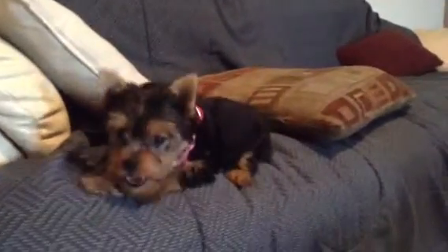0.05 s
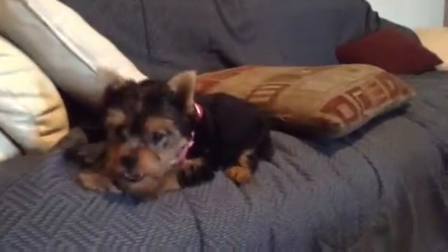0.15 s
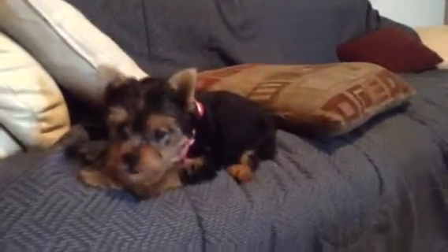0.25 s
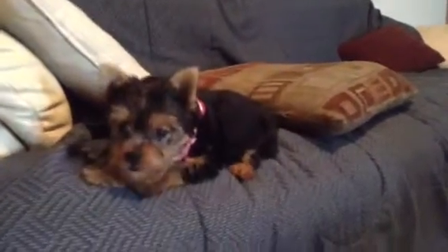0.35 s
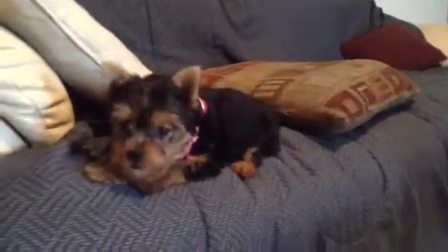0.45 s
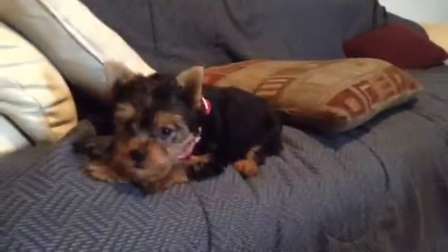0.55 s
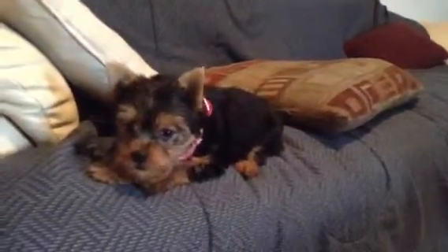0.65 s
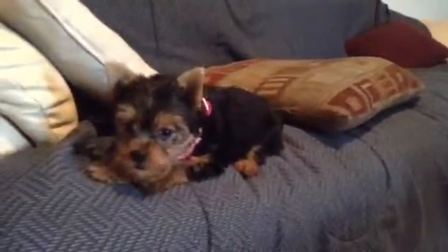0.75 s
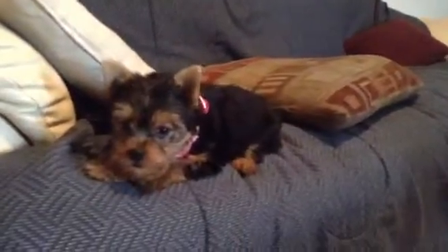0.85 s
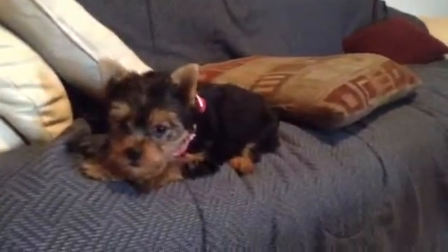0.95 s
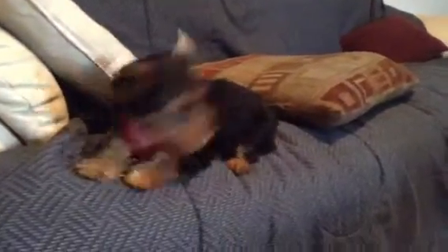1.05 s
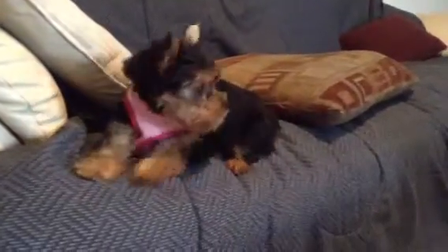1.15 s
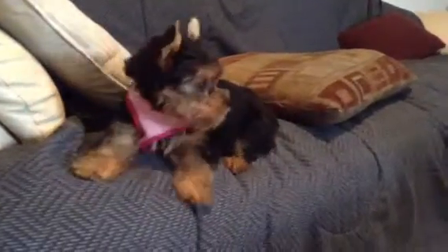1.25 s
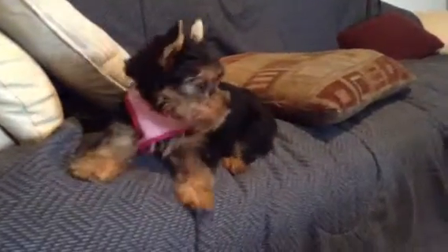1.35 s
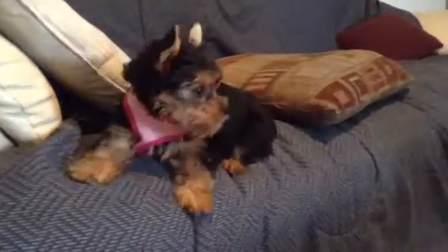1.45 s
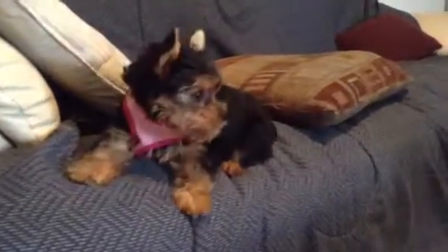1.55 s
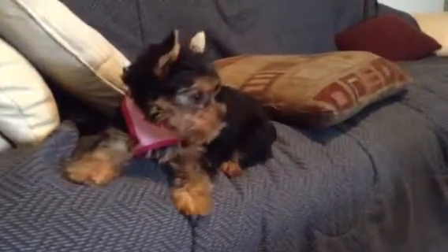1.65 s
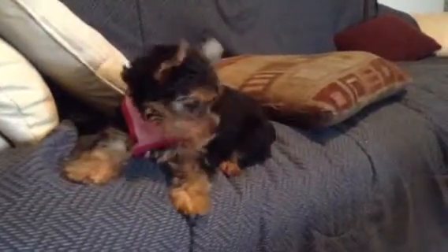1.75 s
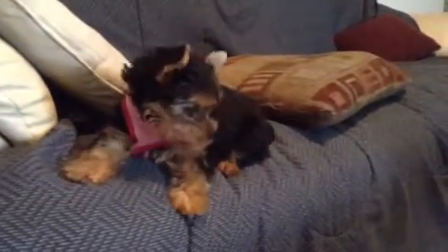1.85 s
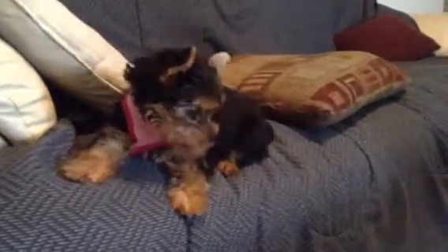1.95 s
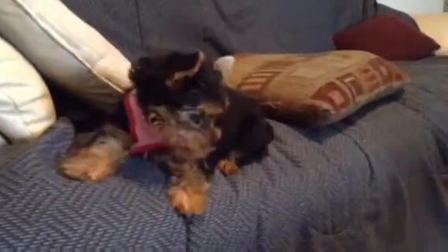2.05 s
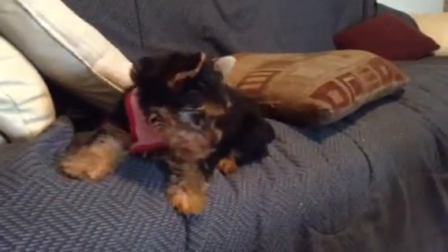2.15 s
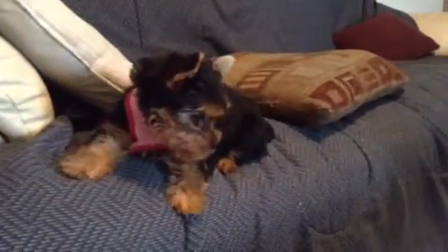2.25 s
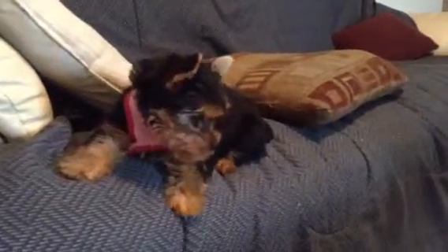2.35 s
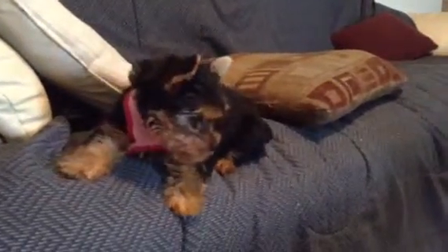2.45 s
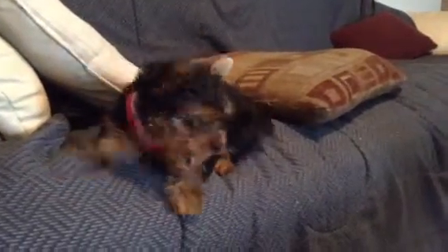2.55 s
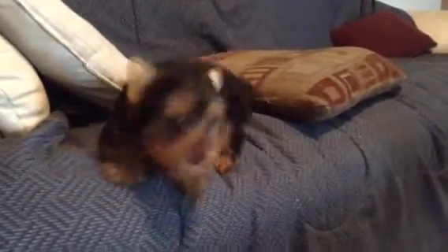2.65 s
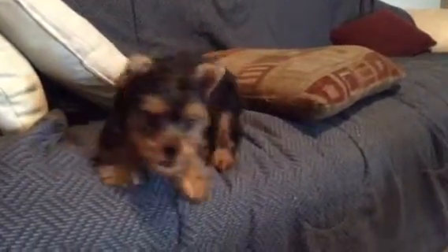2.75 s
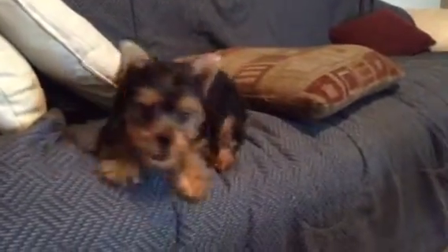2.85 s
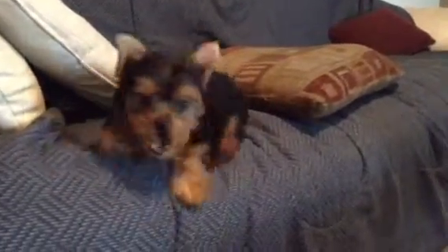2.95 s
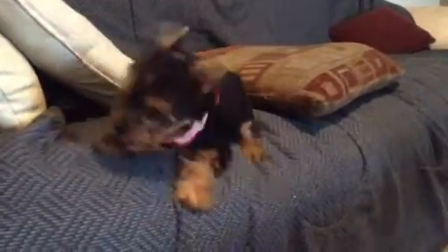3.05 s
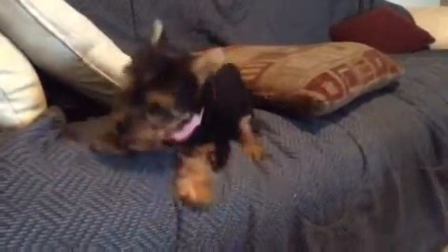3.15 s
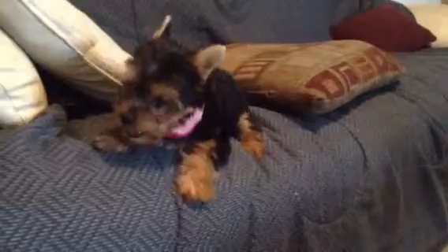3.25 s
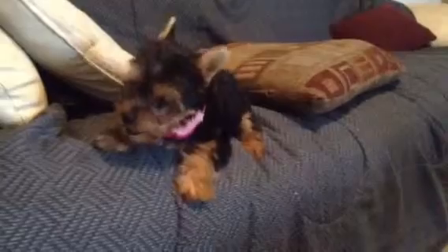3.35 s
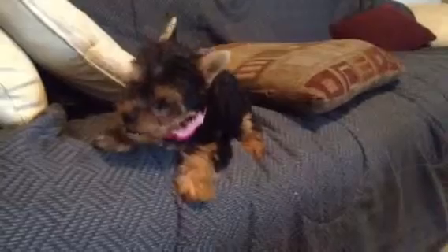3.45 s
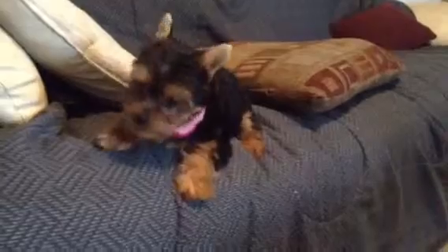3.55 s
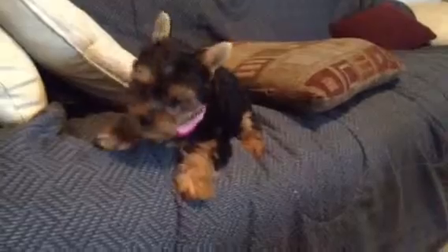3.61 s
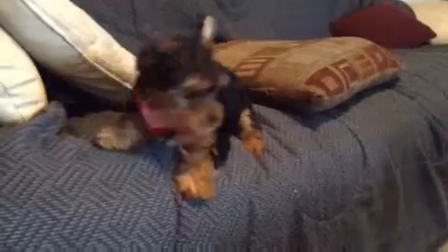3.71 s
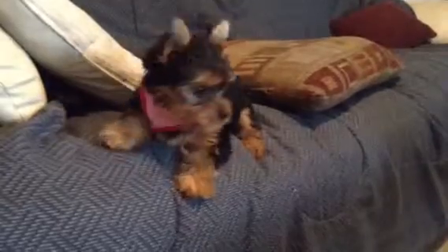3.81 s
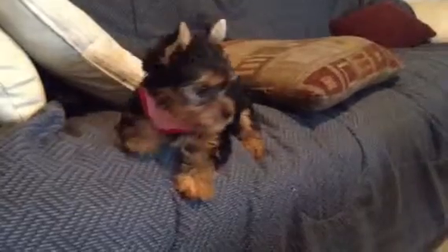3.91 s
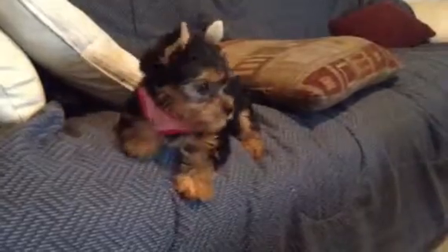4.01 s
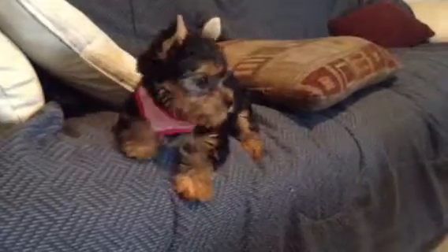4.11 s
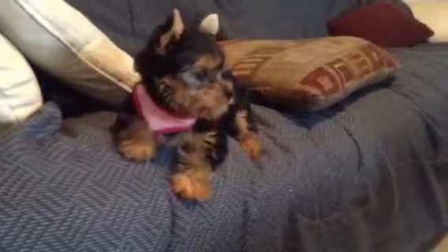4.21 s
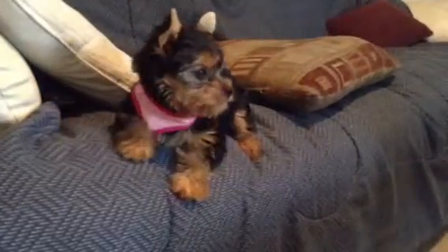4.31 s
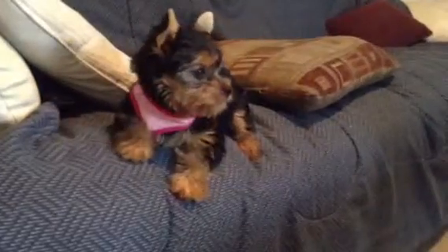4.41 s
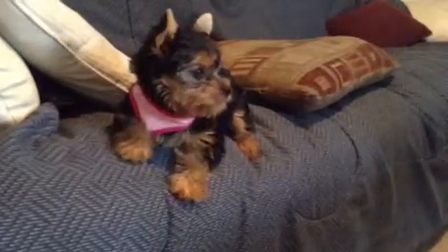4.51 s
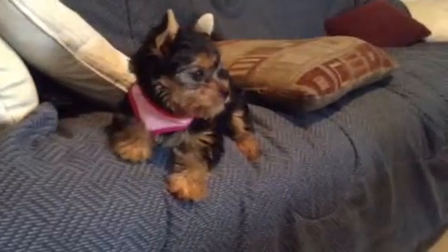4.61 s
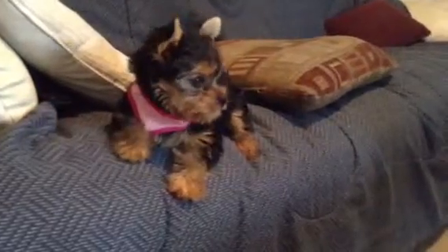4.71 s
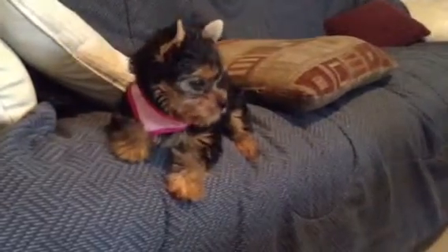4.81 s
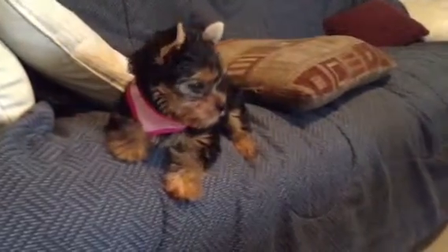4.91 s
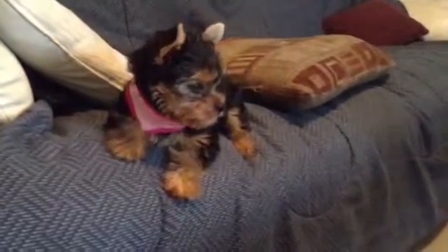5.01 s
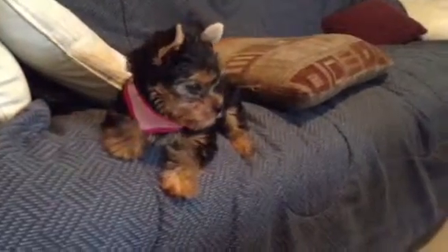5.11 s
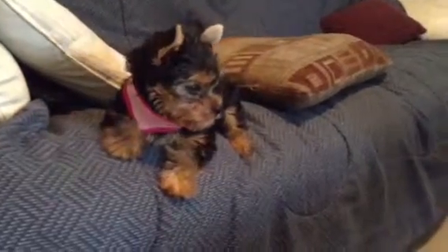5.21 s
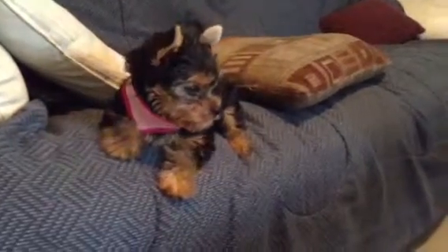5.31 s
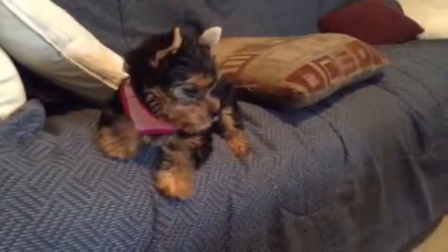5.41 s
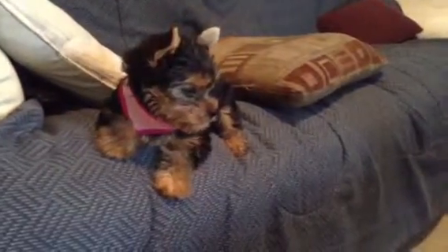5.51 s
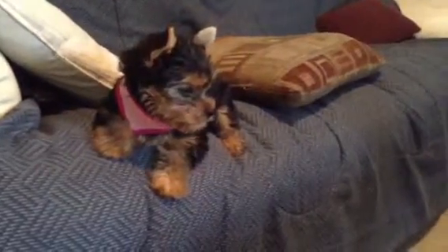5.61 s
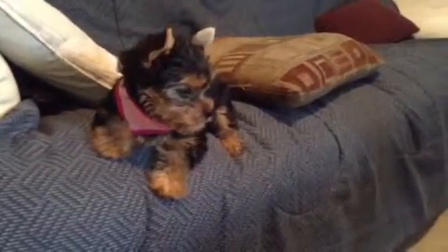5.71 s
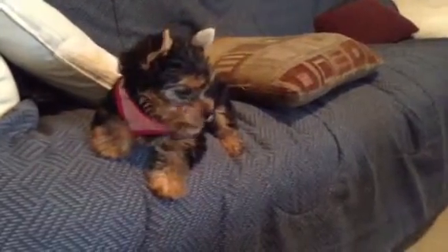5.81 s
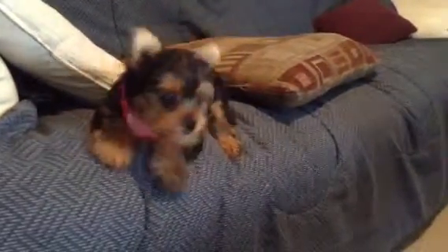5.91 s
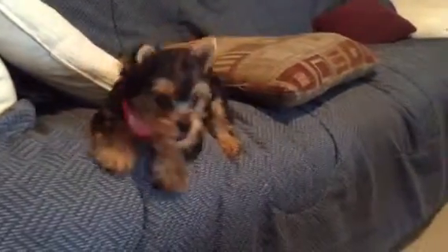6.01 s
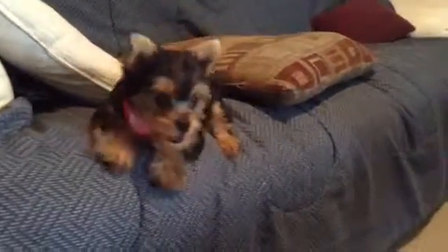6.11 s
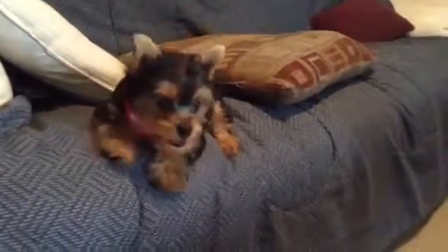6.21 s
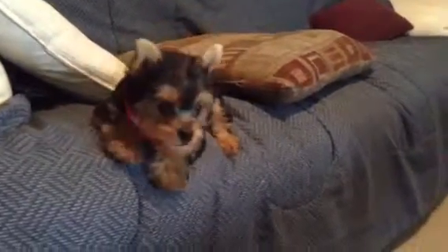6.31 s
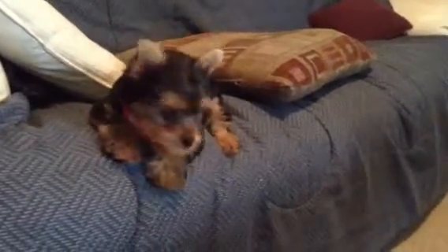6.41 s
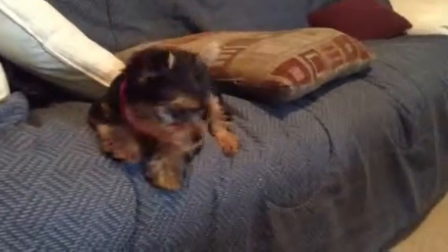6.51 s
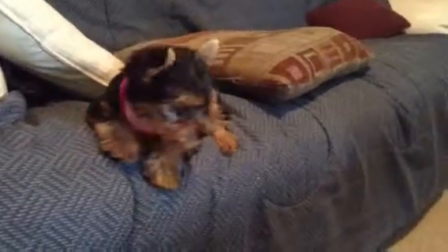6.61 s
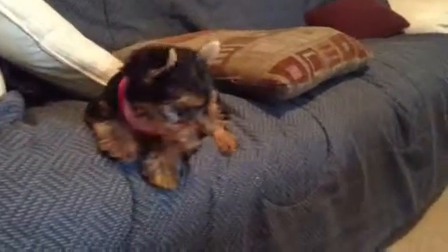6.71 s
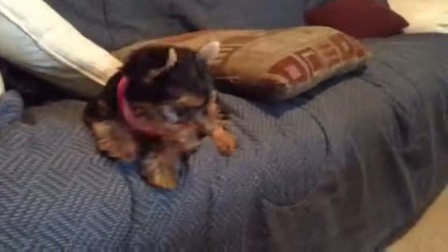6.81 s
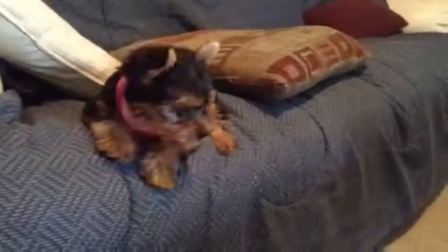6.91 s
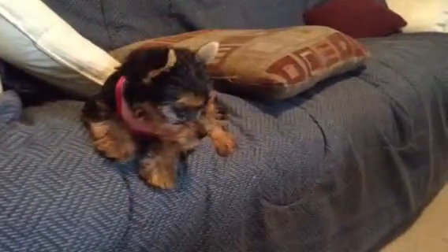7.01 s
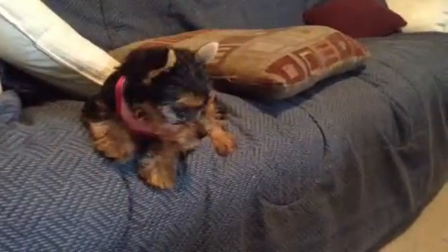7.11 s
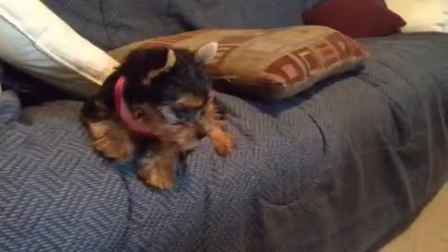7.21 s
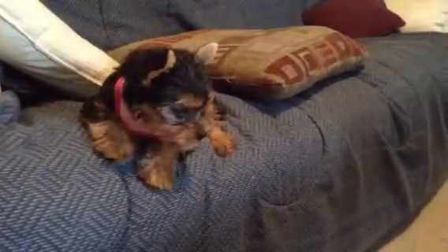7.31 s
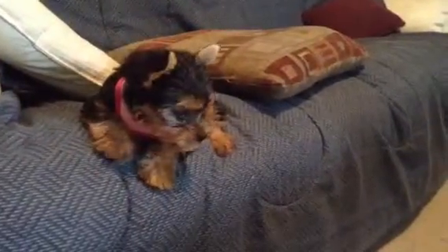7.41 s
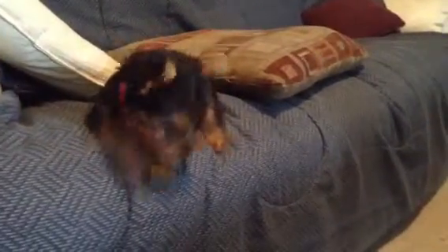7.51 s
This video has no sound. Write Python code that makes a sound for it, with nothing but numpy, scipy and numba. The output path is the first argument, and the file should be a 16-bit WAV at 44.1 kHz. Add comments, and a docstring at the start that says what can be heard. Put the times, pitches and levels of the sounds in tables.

```python
"""A small puppy on a sofa, close up in a fairly live living room with steady air and a faint mains hum.
The ring of a yip dies away into grunts, a huff and paws scuffing the blanket, then a tiny whimper leads to
a shrill yip, a bark and more huffs. Paws scuff harder, a second bark follows, then huffs and a low grumble,
and the collar chinks once. Voices are vocal-fold pulses and breath through throat and mouth filters;
huffs and cloth are shaped noise, the collar is a bank of ringing modes, and a noise tail makes the room."""
import sys
import numpy as np
from scipy import signal
from scipy.fft import rfft, irfft
from scipy.io import wavfile
from scipy.ndimage import uniform_filter1d, minimum_filter1d
from numba import njit

SR = 44100
rng = np.random.default_rng(int(sys.argv[2]) if len(sys.argv) > 2 else 0)


def store_wav(level_fs):
    """Save 16-bit WAV to argv[1]."""
    pcm = np.round(np.clip(np.atleast_2d(level_fs), -1, 1) * 32767)
    wavfile.write(sys.argv[1], SR, pcm.T.astype(np.int16))


N = 333207
LEAD = SR // 5  # samples of run-up, cut off at the end, so that a yip can start before time 0
TIME = np.arange(-LEAD, N) / SR
TOP_HZ = 15400

# Yips. Each row: start in seconds, held level in dB, pitch as a factor on the usual course.
YIPS = [(-.105, -13, 1.02), (2.668, -10, 1.025)]
# The usual course of a yip, which climbs, cracks to a lower note and sags. Each row: seconds after its
# start, pitch in Hz before the factor of that yip, roughness from 0 to 1, mouth resonance in Hz.
YIP_COURSE = [(0, 1000, .05, 1100), (.009, 1130, .35, 1300), (.018, 1510, .35, 1550),
              (.034, 1660, .3, 1650), (.04, 1280, .8, 2600), (.064, 1260, .4, 2480),
              (.076, 1040, .12, 3120), (.085, 820, .2, 1300), (.114, 560, .2, 700)]
YIP_ATTACK_S, YIP_HOLD_S, YIP_RELEASE_S = .004, .074, .008
YIP_ONSET_DB, YIP_RELEASE_DB, YIP_END_DB = -13.5, -18, -31.5  # against the held level
# Tone of throat and muzzle in each call. Each row: frequency in Hz, relative gain in dB.
FIRST_YIP_THROAT = [(500, -32.5), (900, -24), (1250, -2.5), (1650, 8), (2100, -8.5), (2600, 0), (3150, -11),
                    (3700, -3), (5500, -23.5), (7500, -37.5), (11500, -30.5), (15000, -53)]
SHRILL_YIP_THROAT = [(550, -18.5), (1050, -15), (1500, -2.5), (2500, -0.5), (3200, -3), (4300, -4.5),
                     (5200, -16.5), (6500, -18), (8000, -27.5), (12500, -29.5), (15000, -29.5)]
FIRST_BARK_THROAT = [(200, -18), (560, -25.5), (1120, -5.5), (1700, 0), (2250, -6), (2850, -2),
                     (3400, -10.5), (4000, -6), (5200, -15), (7500, -33), (9500, -33), (12000, -24),
                     (15000, -38.5)]
LAST_BARK_THROAT = [(200, -22), (530, -20), (1080, -6), (1650, -6.5), (2200, -10), (2700, -4), (3300, -7),
                    (4300, -11), (5400, -12.5), (6600, -22), (8500, -29.5), (9800, -42), (12000, -24),
                    (15000, -39)]
CLOSED_MUZZLE = [(90, -30.5), (210, 1), (450, -4.5), (700, -5.5), (1000, -13), (2500, -29), (4000, -40),
                 (5400, -18), (7500, -54), (11500, -31), (15000, -52)]
# How long the room rings. Each row: frequency in Hz, time to fall by 60 dB in seconds.
ROOM_T60 = [(150, 0.42), (700, 0.61), (1600, 0.62), (3000, 0.52), (5500, 0.52), (9000, .42), (15000, 0.27)]
# Tone of the still room air. Each row: frequency in Hz, relative gain in dB.
AIR_COLOUR = [(35, -39), (60, -17), (90, 2.5), (130, 5), (250, 1.5), (500, -4.5), (1000, -9), (2000, -15),
              (4000, -19), (8000, -17.5), (14000, -18.5)]
AIR_DB = -71

# Bouts of restless shifting on the cloth. Each row: start in seconds, length in seconds,
# level of the added rustle in dB before its flutter, treble against middle of its brushes in dB before a trim.
BOUTS = [(1.111, 0.83, -77.5, -30), (4.147, 0.65, -71, -3), (5.335, .14, -85, -9), (7.175, .39, -78, -16)]
STILL_DB, STILL_TREBLE_DB = -87, -15  # rustle of the lying puppy, and its treble against its middle
BRUSHES_PER_S, BRUSH_DB, BRUSH_SPREAD_DB = 6, 8, 4  # light brushes of fur, level above the bout's rustle
BRUSH_RISE_S, SCUFF_FADE_S = .012, .025
# The firmest scuffs of a paw on the blanket. Each row: start in seconds, level in dB,
# treble against middle in dB before a trim, rise in seconds.
SCUFFS = [(0.62, -53, -34, 0.029), (1.525, -59, -35, 0.012), (1.958, -62, -30, 0.018),
          (2.075, -56.5, -10, 0.013), (2.36, -59.5, -28, .03), (2.588, -58, -16.5, .002),
          (2.61, -56.5, -8.5, 0.026), (4.099, -55.5, -4, .002), (4.261, -53, -12, 0.0021),
          (4.441, -59, 1, 0.0082), (4.567, -51, -20, 0.018), (4.727, -50.5, 7, 0.0025),
          (4.865, -66.5, -15, 0.0082), (6.958, -57.5, -26, 0.017), (7.103, -52, -25, .03)]
# Middle and treble tone of rubbed cloth. Each row: frequency in Hz, relative gain in dB.
SCUFF_COLOUR = [(250, -11), (550, -3), (1000, 1), (1800, -3), (3500, -5), (6000, -17), (9000, -28.5),
                (15000, -37.5)]
SCUFF_TREBLE = [(3000, -24.5), (6000, -2.5), (9000, 1.5), (11500, -10), (15000, -14)]

# Grunts, whimpers and grumbles with the muzzle shut. Each row: start in seconds, length in seconds,
# top pitch in Hz, top level in dB, roughness from 0 to 1, nasal resonance in Hz.
MUTTERS = [(0.169, 0.073, 211.5, -43, 0.16, 370), (0.228, 0.062, 207.3, -48, 0.17, 215),
           (2.282, 0.046, 685, -63, 0.3, 700), (2.33, 0.05, 628.5, -64, .18, 621),
           (6.341, 0.088, 197.7, -47.5, 0.36, 630), (6.395, 0.049, 80.7, -46, 0.48, 564),
           (6.448, 0.059, 87.3, -51, 0.5, 546), (6.554, 0.109, 104.3, -54, .3, 583)]
MUTTER_EDGE_DB, MUTTER_SAG = -26, 0.1  # level change and share of pitch lost at either end

# Huffs through the nose. Each row: start in seconds, level in dB, rise in seconds, hold in seconds,
# fade in seconds, tilt of the upper hiss in dB per octave.
HUFFS = [(0.819, -40.5, 0.021, 0.0039, 0.033, -6), (3.443, -35.5, 0.028, 0.035, 0.072, 1.5),
         (3.733, -40, 0.029, 0.023, 0.053, -3), (3.851, -46.5, 0.03, 0.042, 0.037, 0.5),
         (6.263, -40, 0.082, 0.015, 0.037, 7), (6.486, -44, 0.04, 0.0056, 0.061, 0)]
# Tone of a huff before that tilt. Each row: frequency in Hz, relative gain in dB.
HUFF_COLOUR = [(88, -43), (150, -18.5), (350, -3), (409, -11), (486, -0.5), (787, -4), (850, -2.5),
               (918, -3), (2230, -5.5), (6430, -7), (11000, -15.5), (15000, -30)]

# High resonance of the lips. Each row: seconds after the start of the call, frequency in Hz.
YIP_LIPS = [(.004, 3200), (.02, 4400), (.036, 4350), (.046, 3750), (.068, 3550), (.082, 2500)]
BARK_LIPS = [(.038, 10050), (0.062, 9300), (0.083, 6100), (.093, 3900), (.108, 3610)]
# Barks. Each row: start in seconds, rise in seconds, fall in seconds, jaws open after seconds,
# jaws shut after seconds, top pitch in Hz, level in dB at full effort with jaws open,
# roughness added away from the top of the effort, open mouth resonance in Hz, level of the puff in dB.
BARKS = [(3.004, .061, .057, .015, .103, 571.9, -9.5, .75, 1702, -24),
         (5.892, .075, .063, 0.031, 0.086, 550.6, -10.5, 0.3, 2050, -45)]
SLACK_HZ = 300  # pitch without effort
SHUT_MOUTH_HZ, FORCED_MOUTH_HZ = 610, 675.6  # shut-jaw resonance; its rise as effort forces the lips apart
EFFORT_POWER, JAW_S = 1.65, 0.0042  # narrowness of the swell; time constant of the jaws
SLACK_DB, SHUT_DB = -9.5, -17  # level change without effort, and behind shut jaws
# the folds lock into a clear note as effort nears the top (all 0-1)
CLEAR_EFFORT, CLEARING_EFFORT, CLEAR_ROUGHNESS = .87, .25, .08
FALL_ROUGHNESS = 0.81  # share of the roughness that returns as effort ebbs
PUFF_SHARE, PUFF_S = .65, .003  # the puff peaks this far up the rise; its spread
# Tone of the puff. Each row: frequency in Hz, relative gain in dB.
PUFF_COLOUR = [(40, -4.5), (200, -9), (500, -13.5), (1500, -36)]

# The collar's metal ring. Each row: mode in Hz, relative level in dB, time to fall by 60 dB in seconds.
COLLAR = [(3020, -8, 0.14), (4200, -5.5, 0.088), (5160, -7, 0.086), (5530, -19, .1), (5800, 5.5, 0.053),
          (6100, -20, .15), (6500, -0.5, 0.073), (7500, -2, 0.11), (7850, -2, 0.22), (9500, -25, 0.17),
          (10680, 0.5, 0.11), (10850, -6, .1), (12300, -15, .1), (13200, -3.5, .1), (14100, -12, .08)]


def undb(db):
    """Decibels to gain."""
    return 10 ** (np.asarray(db) / 20)


def unit(x):
    """Scale to rms 1."""
    return x / np.sqrt(np.mean(x ** 2) + 1e-18)


def noise(size):
    """White noise with spread 1."""
    return rng.standard_normal(size)


def on_log_axis(points, hz):
    """Read (Hz, value) points on a log-frequency axis."""
    f, value = np.transpose(points)
    return np.interp(np.log(np.maximum(hz, 1)), np.log(f), value)


def colour(x, points):
    """Minimum-phase filter with the given (Hz, dB) response, closed off below its lowest point."""
    size = 2048
    hz = np.arange(size // 2 + 1) * SR / size
    low_cut = 1 + (0.38 * points[0][0] / np.maximum(hz, 10)) ** 2
    log_gain = np.log(undb(on_log_axis(points, hz)) / low_cut)
    # folding the cepstrum forward in time makes the filter causal
    cepstrum = irfft(log_gain)
    cepstrum[1:size // 2] *= 2
    cepstrum[size // 2 + 1:] = 0
    impulse = irfft(np.exp(rfft(cepstrum)))
    return signal.oaconvolve(x, impulse)[:len(x)]


def wander(size, rate):
    """Random motion with spread about 1, gliding between `rate` fresh values a second."""
    knots = noise(size // 8 + 2)
    return np.interp(np.arange(size) * rate / SR, np.arange(len(knots)), knots) * np.sqrt(3 / 2)


@njit
def resonance(x, hz, width):
    """State-variable band-pass with a moving centre, gain 1 there."""
    y, low_state, band_state = np.empty(len(x)), 0., 0.
    for i in range(len(x)):
        g, k = np.tan(np.pi * hz[i] / SR), width / hz[i]
        v = (band_state + g * (x[i] - low_state)) / (1 + g * (g + k))
        band_state = 2 * v - band_state
        low_state += 2 * g * v
        y[i] = k * v
    return y


def call(rows, throat, jitter, split, breath_db, mouth_db, mouth_width_hz,
         smear=0.75, order=2, airy_hz=7000, air_db=-3):
    """Vocal-fold pulses and gated breath through the throat and a moving mouth resonance.
    Each row: seconds, pitch in Hz, level in dB, roughness from 0 to 1, mouth resonance in Hz."""
    s, *columns = np.transpose(rows)
    sounding = (TIME >= s[0]) & (TIME <= s[-1])
    t = TIME[sounding]
    hz, db, rough, mouth_hz = (np.interp(t, s, c) for c in columns)
    rough = np.clip(rough, 0, 1)
    # strained folds lose their regular beat
    hz = hz * np.exp(jitter * rough * wander(len(t), 1.2 * hz.mean()))
    phase = 2 * np.pi * np.cumsum(hz) / SR
    k = np.arange(1, int(TOP_HZ / hz.min()) + 1)[:, None]
    # harmonics are staggered in phase, so each pulse rings on
    harmonics = np.cos(k * phase + smear * k * np.log(k)) * (k * hz < TOP_HZ)
    pulses = unit(np.sum(harmonics / (1 + (k * hz / airy_hz) ** 4), axis=0))
    # one cycle in every `order` is stronger, which puts lines between the harmonics
    pulses *= 1 + rough * (split * np.cos(phase / order) + 1.3 * wander(len(t), hz.mean()))
    breath = noise(len(t)) * (1 + np.cos(phase)) * rough * undb(breath_db)
    # high up, rushing air takes over from the harmonics
    hiss = unit(colour(noise(len(t)), [(airy_hz / 2, -24), (airy_hz, -6), (TOP_HZ, 0)]))
    source = pulses + breath + hiss * (1 + np.cos(phase) / 2) * undb(air_db)
    # a low mouth resonance means nearly closed jaws, and a muffled voice
    opening = np.clip((mouth_hz - 450) / 750, .02, 1) ** 2
    voice = opening * colour(source, throat) + (1 - opening) * 1.4 * colour(source, CLOSED_MUZZLE)
    voice = voice + undb(mouth_db) * resonance(voice, mouth_hz, float(mouth_width_hz))
    # even out the loudness over about three cycles, so that the rows alone set the level
    power = uniform_filter1d(voice ** 2, size=int(np.pi * SR / hz.mean()))
    voice /= np.sqrt(np.abs(power) + 1e-12)
    out = np.zeros(len(TIME))
    out[sounding] = voice * undb(db) * signal.windows.tukey(len(t), .03)
    return out


def yip_course(start, db, pitch):
    """A yip snaps on, holds its level and breaks off into a faint falling tail."""
    s, hz, rough, mouth_hz = np.transpose(YIP_COURSE)
    t = np.linspace(0, s[-1], 200)
    corners = np.append(np.cumsum([0, YIP_ATTACK_S, YIP_HOLD_S, YIP_RELEASE_S]), s[-1])
    level = db + np.interp(t, corners, [YIP_ONSET_DB, 0, 0, YIP_RELEASE_DB, YIP_END_DB])
    glide = pitch * np.interp(t, s, hz)
    return np.column_stack([start + t, glide, level, np.interp(t, s, rough), np.interp(t, s, mouth_hz)])


def first_yip():
    """A breathy yip that starts ahead of time 0, so that mostly its ring is heard."""
    return call(yip_course(*YIPS[0]), FIRST_YIP_THROAT, jitter=0.18, split=0.83, breath_db=15.0,
                mouth_db=-0.5, mouth_width_hz=200)


def room(x, gap_s, build_s):
    """Reflections thicken after a short gap, then die away, the middle lingering longest."""
    t = np.arange(SR) / SR
    hz = np.arange(SR // 2 + 1)
    spectrum = rfft(noise(SR))
    tail = 0
    # each row of the identity matrix picks one band, cross-faded with its neighbours
    for (_, t60), share in zip(ROOM_T60, np.eye(len(ROOM_T60))):
        band = on_log_axis(np.column_stack([np.array(ROOM_T60)[:, 0], share]), hz)
        tail = tail + irfft(spectrum * band, SR) * undb(-60 * t / t60)
    tail *= np.clip((t - gap_s) / build_s, 0, 1)
    return signal.fftconvolve(x, unit(tail) / np.sqrt(SR))[:len(x)]


def background(hum_hz, hum_db):
    """Still room air as coloured noise, and a mains hum as a sine of slightly wavering level."""
    air = unit(colour(noise(len(TIME)), AIR_COLOUR)) * undb(AIR_DB)
    hum = unit(np.sin(2 * np.pi * hum_hz * TIME)) * undb(hum_db + 1.7 * wander(len(TIME), 5.7))
    return air + hum


def fibres(spectrum, grain_db):
    """Cloth fibres catch and slip in dense uneven grains."""
    grains = noise(len(TIME)) * undb(grain_db * wander(len(TIME), 600))
    return unit(colour(grains, spectrum))


def brushes():
    """Light strokes of fur, loosely spaced through each bout: rows like those of the scuffs."""
    rows = []
    for start, length, db, bright_db in BOUTS:
        for s in np.arange(start, start + length - .5 / BRUSHES_PER_S, 1 / BRUSHES_PER_S):
            at_s = s + .5 * rng.random() / BRUSHES_PER_S
            level = db + BRUSH_DB + BRUSH_SPREAD_DB * rng.standard_normal()
            rows.append((at_s, level, bright_db, BRUSH_RISE_S))
    return rows


def blanket(treble_trim_db):
    """Single scuffs of a paw and light brushes over the soft rustle of a restless body."""
    cloth = fibres(SCUFF_COLOUR, grain_db=3.0)
    hiss = fibres(SCUFF_TREBLE, grain_db=3.5)
    restless = sum(undb(db) * ((TIME > start) & (TIME < start + length)) for start, length, db, _ in BOUTS)
    flutter = undb(4.3 * wander(len(TIME), 25))
    body = (undb(STILL_DB) + uniform_filter1d(restless, size=SR // 10)) * flutter
    treble = undb(STILL_TREBLE_DB) * body
    for s, db, bright_db, rise in SCUFFS + brushes():
        near = slice(*np.searchsorted(TIME, [s, s + .5]))
        age = TIME[near] - s
        fade = np.exp(-np.maximum(age - rise, 0) / SCUFF_FADE_S)
        stroke = undb(db) * np.minimum(age / rise, 1) * fade
        body[near] += stroke
        treble[near] += stroke * undb(bright_db + treble_trim_db)
    return body * cloth + treble * hiss


def mutter_course(start, length, hz, db, rough, nasal_hz):
    """A small arch of pitch and level behind a shut muzzle."""
    along = np.linspace(0, 1, 50)
    slack = (2 * along - 1) ** 2
    pitch = hz * (1 - MUTTER_SAG * slack)
    level = db + MUTTER_EDGE_DB * slack
    return np.column_stack(np.broadcast_arrays(start + length * along, pitch, level, rough, nasal_hz))


def mutters():
    """Grunts, whimpers and grumbles: fold pulses muffled by the shut muzzle, with a nasal resonance."""
    return sum(call(mutter_course(*row), CLOSED_MUZZLE, jitter=.33, split=.4, breath_db=0,
                    mouth_db=8, mouth_width_hz=130, smear=.3) for row in MUTTERS)


def huffs(flutter_db, hiss_hz=4000):
    """Short fluttering blasts of air through the nose, their hiss tilted above `hiss_hz`."""
    out = np.zeros(len(TIME))
    t = np.arange(SR // 3) / SR
    for s, db, rise, hold, fade, tilt_db in HUFFS:
        swell = np.sin(np.pi / 2 * np.clip(t / rise, 0, 1)) ** 2
        shape = swell * np.exp(-np.maximum(t - rise - hold, 0) / fade)
        spectrum = [(hz, band_db + tilt_db * np.log2(max(hz / hiss_hz, 1))) for hz, band_db in HUFF_COLOUR]
        fluttering = noise(len(t)) * undb(flutter_db * wander(len(t), 264))
        start = LEAD + int(s * SR)
        out[start:start + len(t)] += unit(colour(fluttering, spectrum)) * shape * undb(db)
    return out


def closing_lips(voice, start, sweep, db, width_hz):
    """The lips add a high resonance that moves through the call and sinks as they close."""
    lips_hz = np.interp(TIME - start, *np.transpose(sweep))
    return voice + undb(db) * resonance(voice, lips_hz, float(width_hz))


def shrill_yip():
    """A yip whose every third cycle is stronger where it is rough, with a lip resonance on top."""
    voice = call(yip_course(*YIPS[1]), SHRILL_YIP_THROAT, jitter=0.075, split=1.4, breath_db=-4,
                 mouth_db=3, mouth_width_hz=390, smear=0.58, order=3, air_db=3.0)
    return closing_lips(voice, YIPS[1][0], YIP_LIPS, db=-4.5, width_hz=400)


def bark_course(start, rise, fall, opens, shuts, top_hz, db, rough, open_hz):
    """One swell of effort lifts pitch and level and clears the voice, while the jaws open and shut."""
    t = np.linspace(0, rise + fall, 200)
    swell = np.interp(t, [0, rise, rise + fall], [0, 1, 0])
    effort = np.sin(np.pi / 2 * swell) ** EFFORT_POWER
    jaws = 1 / (1 + np.exp((opens - t) / JAW_S)) / (1 + np.exp((t - shuts) / JAW_S))
    hz = SLACK_HZ + (top_hz - SLACK_HZ) * effort
    level = db + SLACK_DB * (1 - effort) + SHUT_DB * (1 - jaws)
    roughness = CLEAR_ROUGHNESS + rough * np.clip((CLEAR_EFFORT - effort) / CLEARING_EFFORT, 0, 1)
    roughness *= np.interp(t, [rise, rise + fall / 2], [1, FALL_ROUGHNESS])
    shut_hz = SHUT_MOUTH_HZ + FORCED_MOUTH_HZ * effort
    mouth_hz = shut_hz + (open_hz - shut_hz) * jaws
    return np.column_stack([start + t, hz, level, roughness, mouth_hz])


def first_bark():
    """A bark with rough edges, its airy top strong and its mouth resonance narrow."""
    return call(bark_course(*BARKS[0][:-1]), FIRST_BARK_THROAT, jitter=0.06, split=0.3, breath_db=-1.5,
                mouth_db=2, mouth_width_hz=130, smear=1.4, airy_hz=6000, air_db=6.5)


def puffs():
    """Each bark throws a puff of air that thumps on the microphone."""
    shape = 0
    for start, rise, *_, puff_db in BARKS:
        offset = TIME - start - PUFF_SHARE * rise
        shape = shape + undb(puff_db) * np.exp(-.5 * (offset / PUFF_S) ** 2)
    return shape * unit(colour(noise(len(TIME)), PUFF_COLOUR))


def last_bark():
    """A clearer bark with a strong mouth resonance and a bright sweep of the lips."""
    voice = call(bark_course(*BARKS[1][:-1]), LAST_BARK_THROAT, jitter=0.088, split=0.55, breath_db=3.0,
                 mouth_db=12, mouth_width_hz=350, smear=0.9, airy_hz=8040, air_db=1.5)
    return closing_lips(voice, BARKS[1][0], BARK_LIPS, db=16.5, width_hz=840)


def collar(at_s, db, rattle_s, tick_db):
    """The ring chatters against its buckle for a moment and rings in high modes."""
    t = np.arange(SR // 3) / SR
    contacts = noise(len(t)) * np.exp(-t / rattle_s)
    modes = sum(undb(mode_db - 60 * t / t60) * np.sin(2 * np.pi * hz * t) for hz, mode_db, t60 in COLLAR)
    ring = unit(signal.fftconvolve(contacts, modes)[:len(t)])
    tick = unit(colour(contacts, SCUFF_TREBLE))
    chink = ring + undb(tick_db) * tick
    return np.interp(TIME, at_s + t, chink, left=0, right=0) * undb(db)


def scene():
    """Each sound arrives directly and by the walls; the puffs and the background stay direct."""
    # each pair: sound, level sent to the room in dB
    sources = [
        (first_yip(), -8),
        (blanket(treble_trim_db=-2), -5),
        (mutters(), -11),
        (huffs(flutter_db=1.5), -9),
        (shrill_yip(), -8),
        (first_bark(), -11),
        (last_bark(), -13),
        (collar(at_s=7.046, db=-57, rattle_s=0.022, tick_db=-2), -2)]
    direct = sum(sound for sound, _ in sources) + puffs()
    walls = room(sum(sound * undb(db) for sound, db in sources), gap_s=0.0009, build_s=0.0043)
    return (direct + walls + background(hum_hz=120.7, hum_db=-75.5))[None, LEAD:]


def record(dry):
    """A fast limiter holds down the loudest sounds, the peaks are rounded, and the top is cut."""
    limit, ceiling = .95, .85  # of full scale
    gain = minimum_filter1d(limit / np.maximum(np.abs(dry), limit), size=89)
    held = dry * uniform_filter1d(gain, size=89)
    rounded = held / (1 + (held / ceiling) ** 8) ** (1 / 8)
    top_cut = signal.ellip(10, .2, 80, TOP_HZ, fs=SR, output="sos")
    return signal.sosfilt(top_cut, rounded)


dry = scene()
out = record(dry)
store_wav(out)
```